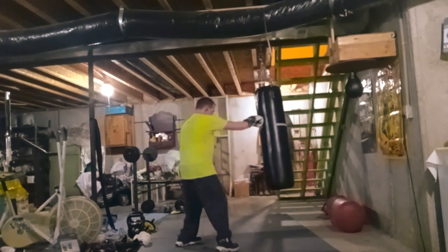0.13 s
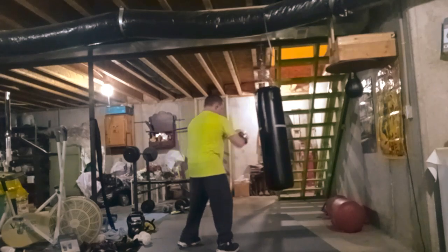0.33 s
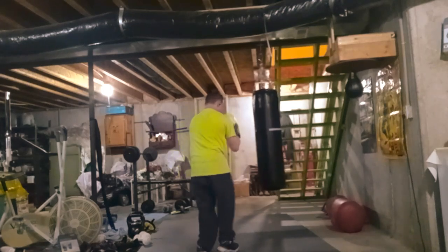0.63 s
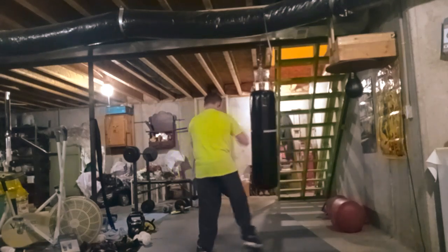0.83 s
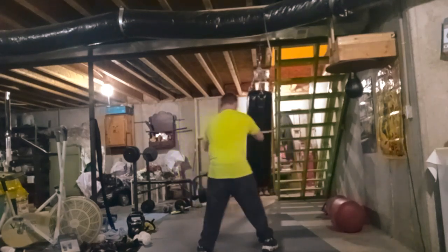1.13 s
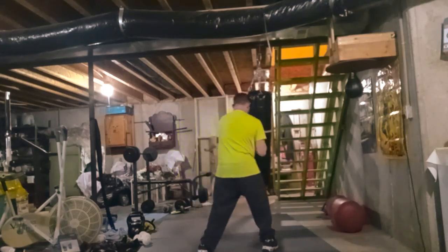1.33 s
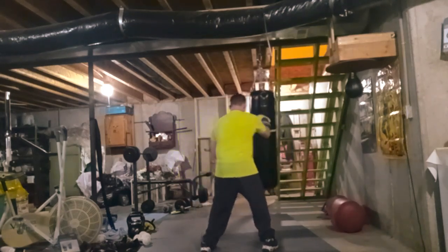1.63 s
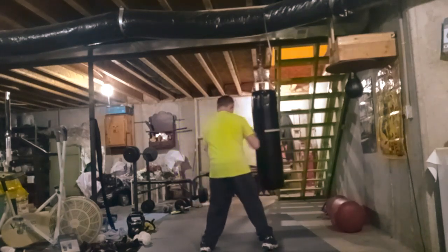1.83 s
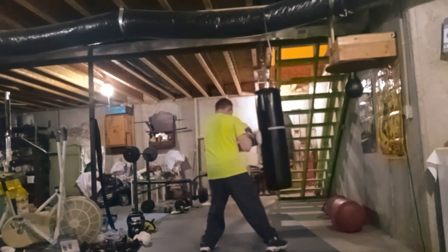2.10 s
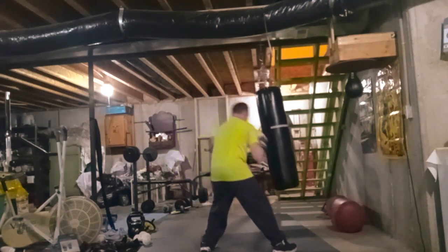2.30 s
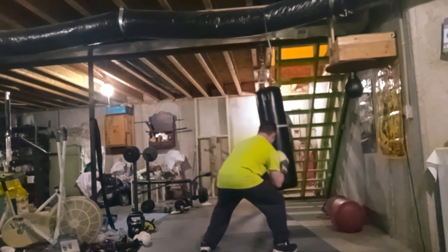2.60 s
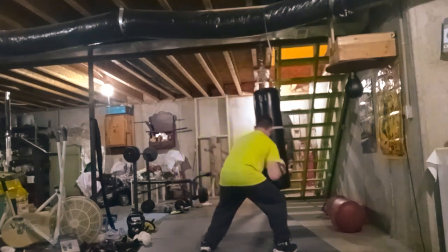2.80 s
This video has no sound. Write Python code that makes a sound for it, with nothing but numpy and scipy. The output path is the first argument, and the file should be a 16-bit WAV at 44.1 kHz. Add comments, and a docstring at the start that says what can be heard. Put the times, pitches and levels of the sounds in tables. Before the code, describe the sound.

Punching bag workout: low thuds with hollow knocks and leather slaps, rattling chain, short creaks and a shoe scrape, then the blows stop and a metallic squeal follows; short basement echo, microphone at some distance.

```python
"""A basement gym: a chain clinks, then gloves hit a heavy bag, each blow a low thud, hollow knock and leather slap.
The bag rumbles, the steel chain rattles and rings; hanger, swivel and gloves creak and squeak, a shoe slides.
The swivel squeals by stick-slip between the early blows, and again after the last, as the chain clinks on.
Blows, bursts and rattle are shaped, coloured noise; links, squeals and creaks are sines. Concrete walls give
all but the rumble and floor noise a short tail; the noisy layers dip briefly now and then."""
import sys
import numpy as np
from scipy import signal
from scipy.io import wavfile
from scipy.ndimage import uniform_filter1d

SR = 44100
rng = np.random.default_rng(int(sys.argv[2]) if len(sys.argv) > 2 else 0)


def store_pcm(level_fs):
    """Save levels as 16-bit WAV."""
    pcm = np.round(np.clip(level_fs, -1, 1) * 32767).astype(np.int16)
    wavfile.write(sys.argv[1], SR, np.atleast_2d(pcm).T)


N = 130095  # length in samples

# the clearest clinks of the chain: t/s, relative level/dB
CLINK_TIMES = [(0.1007, -21.5), (0.2703, -14), (0.3107, -12), (0.3646, -16), (0.4374, -24), (0.5741, -15),
               (0.622, -12.5), (0.7462, -16), (0.829, -21), (0.9692, -28), (1.0196, -25.5), (1.1059, -13.5),
               (1.1682, -25), (1.2052, -18.5), (1.3369, -15), (1.4596, -23), (1.51, -22.5), (1.5464, -12),
               (1.6756, -24.5), (1.7055, -18), (1.8078, -24), (1.8447, -20.5), (1.8761, -15), (1.9245, -13),
               (1.9714, -15.5), (2.0408, -16.5), (2.1196, -21), (2.2318, -26), (2.396, -24.5),
               (2.7237, -22.5), (2.8255, -25.5)]
# spectrum of leather slapping or scraping: f/Hz, relative level/dB
LEATHER_COLOUR = [(500, -21.5), (1000, -9), (1300, 0.5), (1800, 1), (2250, -4), (2800, -2.5), (3600, -10),
                  (6000, -22)]


def amp(db):
    """Decibels to gain."""
    return 10 ** (np.asarray(db) / 20)


def unit(x):
    """Scales to rms 1."""
    return x / np.sqrt(np.mean(x ** 2) + 1e-20)


def read(points, hz):
    """Reads a table on a log-frequency axis."""
    f, value = np.transpose(points)
    return np.interp(np.log(hz + 1), np.log(f + 1), value)


def follow(points, s):
    """Reads a table at the times s, in straight lines from point to point."""
    return np.interp(s, *np.transpose(points))


def add(mix, s, sound):
    """Mixes a sound in at time s."""
    part = mix[max(round(s * SR), 0):][:len(sound)]
    part += sound[:len(part)]


def lows(x, hz):
    """The part of x below hz."""
    return signal.sosfiltfilt(signal.butter(2, hz, fs=SR, output="sos"), x)


def colour(x, points):
    """Causal (minimum-phase) filter of energy 1 with the given spectrum."""
    log_gain = np.log(amp(read(points, abs(np.fft.fftfreq(8192, 1 / SR)))))
    taps = np.fft.ifft(np.exp(np.conj(signal.hilbert(log_gain)))).real[:4096]
    return signal.fftconvolve(x, taps / np.linalg.norm(taps))[:len(x)]


def waver(length, size):
    """Random unsteadiness of about rms 1, smoothed twice over size samples."""
    smooth = uniform_filter1d(uniform_filter1d(rng.standard_normal(N), size), size)
    return unit(smooth)[:length]


def slipping(hz, jitter):
    """Phase of a stick-slip tone that wavers around the pitch curve hz."""
    wavering_hz = hz * (1 + jitter * waver(len(hz), size=130))
    return 2 * np.pi * np.cumsum(wavering_hz) / SR


def burst(points, attack_s, decay_s, push=0):
    """One contact: a push, then a short, coloured spray of pressure; energy set by its envelope."""
    t = np.arange(SR // 4) / SR
    shape = (1 - np.exp(-t / attack_s)) * np.exp(-t / decay_s)
    shape /= shape.max()
    spray = shape * rng.choice([-1., 1.], len(t))
    first_instant = push * (t == 0)
    sound = colour(spray - first_instant, points)
    return sound * np.linalg.norm(shape) / np.linalg.norm(sound)


def room(x):
    """The basement's tail: sparse reflections off the walls, the treble dying first."""
    # decay of the basement: f/Hz, t60/s
    decay_times = [(60, 0.95), (150, 0.2), (400, 0.64), (1200, 0.56), (6000, 0.34), (15000, 0.14)]
    delay_s, reflections_per_s = .004, 5000
    taps = rng.choice([-1., 1.], SR) * (rng.random(SR) < reflections_per_s / SR)
    hz, t, z = signal.stft(taps, SR, nperseg=256)
    t60 = read(decay_times, hz)[:, None]
    # the root evens out the energy of long and short decays
    decay = amp(-60 * t / t60) * np.sqrt(np.log(1e6) / t60)
    tail = signal.istft(z * decay, SR, nperseg=256)[1]
    out = np.zeros(N)
    add(out, delay_s, signal.fftconvolve(x, tail / np.linalg.norm(taps)))
    return out


def dips():
    """Gain of the noisy sounds, whose level dips briefly."""
    # the dips: t/s, depth/dB
    dip_times = [(0.03, 13), (0.161, 18.5), (0.2, 14.5), (0.693, 13), (.845, 17), (0.994, 8), (1.761, 14.5),
                 (2.063, 15), (2.455, 60), (2.633, 17)]
    half_width_s = 0.01  # from the middle to 1/e of the depth in dB
    t = np.arange(N) / SR
    return amp(-sum(depth_db * np.exp(-((t - s) / half_width_s) ** 2) for s, depth_db in dip_times))


def floor_noise():
    """The quiet background of the basement: steady noise, strongest in the bass."""
    # spectrum of the background: f/Hz, relative level/dB
    floor_colour = [(25, -38), (120, 2), (220, -8), (15000, -61)]
    level_db = -73
    return amp(level_db) * colour(rng.standard_normal(N), floor_colour)


def rumble():
    """The swinging bag and the joists that carry it rumble; the filling rustles above when stirred hard."""
    # level of the rumble: t/s, level/dB
    rumble_level = [(0, -47.5), (.17, -50.5), (.42, -43), (.7, -47), (.86, -52), (1.04, -56), (1.1, -43.5),
                    (1.35, -48), (2.05, -48.5), (2.35, -47.5), (2.5, -53), (2.63, -56), (2.74, -73),
                    (2.95, -52.5)]
    # spectrum of the rumble: f/Hz, relative level/dB
    rumble_colour = [(25, -36), (55, -20), (80, -2), (100, -5.5), (122, 3.5), (170, -2.5), (260, -9.5),
                     (500, -11), (800, -11), (1300, -26.5), (4000, -30)]
    rustle_from_hz, rustle_full_db = 207, -47  # below this level the rustle fades faster than the rumble
    noise = colour(rng.standard_normal(N), rumble_colour)
    level_db = follow(rumble_level, np.arange(N) / SR)
    low = lows(noise, rustle_from_hz)
    rustle = (noise - low) * amp(2 * np.minimum(level_db - rustle_full_db, 0))
    return amp(level_db) * (low + rustle)


def shoe():
    """A sole scrapes the floor: swelling and fading noise with the colour of a slap."""
    # slides of the shoe: t/s of the middle, half length/s (to 1/e), level/dB
    slide_times = [(0.58, 0.063, -41.5), (1.632, 0.058, -46.5), (2.927, 0.035, -55.5)]
    room_db = -10
    t = np.arange(N) / SR
    slides = sum(amp(db) * np.exp(-((t - s) / half_length) ** 2) for s, half_length, db in slide_times)
    scrape = colour(rng.standard_normal(N), LEATHER_COLOUR) * slides
    return scrape + amp(room_db) * room(scrape)


def creaks():
    """Short creaks and squeaks of the hanger, swivel and gloves: stick-slip tones of unsteady pitch."""
    # the creaks and squeaks: t/s, length/s, mean f/Hz, level/dB
    creak_times = [(.188, 0.021, 795, -38), (0.189, 0.031, 522, -36.5), (0.671, 0.036, 2422, -48),
                   (0.827, 0.036, 962, -49), (0.958, 0.15, 2916, -61.5), (0.979, 0.14, 1770, -64),
                   (1.738, 0.038, 789, -33), (1.739, 0.036, 9200, -42), (2.037, 0.046, 818, -44.5),
                   (2.153, 0.025, 1850, -35.5), (2.826, 0.17, 3570, -62.5), (2.888, 0.11, 783, -58)]
    pitch_jitter, room_db = .018, -7  # jitter: rms fraction of the pitch
    out = np.zeros(N)
    for s, length, hz, db in creak_times:
        arch = np.sin(np.pi * np.arange(0, length, 1 / SR) / length)
        tone = np.sin(slipping(np.full(len(arch), hz), pitch_jitter))
        add(out, s, amp(db) * arch * unit(tone))
    return out + amp(room_db) * room(out)


def swivel():
    """Steel sticks and slips on steel: a wavering tone whose partials each flutter."""
    # course of the two squeals: t/s, mean f/Hz, level/dB
    squeal_curves = [
        [(.565, 1224, -43), (.58, 1251, -36.5), (.617, 1264, -49.5), (.626, 1276, -31.5), (.662, 1234, -34.5),
         (.67, 1320, -77)],
        [(2.39, 1266, -44), (2.412, 1244, -32), (2.436, 1267, -43.5), (2.462, 1256, -26), (2.485, 1297, -32.5),
         (2.53, 1324, -31.5), (2.55, 1298, -42.5), (2.585, 1336, -33.5), (2.61, 1250, -62)],
    ]
    # overtones of each squeal: multiple of the pitch, level/dB relative to the fundamental
    squeal_overtones = [
        [(1.91, -11.5), (2.83, -16)],
        [(1.99, -11), (2.96, -23.5)],
    ]
    pitch_jitter, flutter_db, room_db = .012, 2.5, -9  # jitter: rms fraction of the pitch
    out = np.zeros(N)
    for curve, overtones in zip(squeal_curves, squeal_overtones):
        s, hz, db = np.transpose(curve)
        t = np.arange(s[0], s[-1], 1 / SR)
        phase = slipping(np.interp(t, s, hz), pitch_jitter)
        tone = np.zeros(len(t))
        for multiple, partial_db in [(1, 0)] + overtones:
            flutter = flutter_db * waver(len(t), size=280)
            tone += amp(partial_db + flutter) * np.sin(multiple * phase)
        add(out, s[0], unit(tone) * amp(np.interp(t, s, db)))
    return out + amp(room_db) * room(out)


def shaking(s):
    """How hard the chain shakes at time s; this drives both its rattle and its small clinks."""
    # strength of the shaking: t/s, relative level/dB
    shake_level = [(0, -35.5), (.09, -49), (.19, -47.5), (.245, -33.5), (.31, -32.5), (.39, -36),
                   (.5, -42.5), (.58, -34), (.67, -42), (.77, -42.5), (.87, -50), (.96, -56.5),
                   (1.055, -63), (1.065, -39), (1.12, -35), (1.31, -43), (1.35, -45.5), (1.4, -43.5),
                   (1.55, -39), (1.695, -45.5), (1.703, -34), (1.9, -41), (2.11, -37.5), (2.35, -46.5),
                   (2.4, -39), (2.5, -45), (2.7, -58), (2.8, -57.5), (2.84, -48), (2.95, -60.5)]
    return amp(follow(shake_level, s))


def chain_rattle():
    """Loose links scrape and tick against each other at random; each clear clink starts with a tick."""
    # spectrum of links in contact: f/Hz, relative level/dB
    link_contact = [(300, -19), (900, 0.5), (1600, -2), (3000, -7), (4700, -2.5), (6600, 1.5), (7800, -1.5),
                    (10000, 2.5), (12300, 2.5), (13800, 9.5), (16000, 8.5)]
    touches_per_s, touch_spread_db = 2200, -1  # mean rate; spread: mean drop, before its cap
    rattle_db, tick_db, room_db = 5.5, -15, -8
    # links scrape when shaken hard; shaken gently, they only tick
    scrape_below_hz, scrape_full_db = 3500, -48.5
    sizes = amp(touch_spread_db * np.minimum(rng.exponential(1, N), 4))
    sizes = sizes * rng.choice([-1., 1.], N)
    touches = unit(sizes * (rng.random(N) < touches_per_s / SR))
    shake = shaking(np.arange(N) / SR)
    out = amp(rattle_db) * colour(touches * shake, link_contact)
    for s, db in CLINK_TIMES:
        add(out, s, amp(db + tick_db) * burst(link_contact, attack_s=0.0031, decay_s=0.0071))
    scraping = np.sqrt(np.minimum(shake / amp(scrape_full_db), 1))
    out = out - (1 - scraping) * lows(out, scrape_below_hz)
    return out + amp(room_db) * room(out)


def link():
    """One steel link rings in decaying modes; no two links are quite alike."""
    # modes of a link: mean f/Hz, relative level/dB, t60/s
    link_modes = [(10810, -22, .16), (13560, -7, .13), (13627, 0, .18), (13745, -1, .18), (14610, -8, .13),
                  (14660, -4, .15), (14785, -8, .12), (15710, -15, .1)]
    spread, attack_s = 0.00156, 0.0013  # spread: rms fraction of each mode's pitch
    t = np.arange(SR // 4) / SR
    ring = np.zeros(len(t))
    for mode_hz, db, t60 in link_modes:
        hz = mode_hz * (1 + spread * rng.standard_normal())
        ring += amp(db - 60 * t / t60) * np.sin(2 * np.pi * (hz * t + rng.random()))
    return ring * np.minimum(t / attack_s, 1)


def chain_ring():
    """Links ring in clear clinks with a rebound each, and in small random ones while the chain shakes."""
    ring_db, room_db = -3.5, -1
    rebound_s, rebound_db = 0.033, -10  # a link strikes again, softer, within this time
    small_count, small_db, small_law = 170, 2.5, 0.75  # law: small clinks grow more slowly than the shaking
    out = np.zeros(N)
    for s, db in CLINK_TIMES:
        add(out, s, amp(db + ring_db) * link())
        add(out, s + rebound_s * rng.uniform(0.27, 1), amp(db + ring_db + rebound_db) * link())
    # one small clink at a random moment of each equal slot
    slots = np.arange(small_count) + rng.random(small_count)
    for s in slots * N / SR / small_count:
        add(out, s, amp(small_db) * shaking(s) ** small_law * rng.random() * link())
    return out + amp(room_db) * room(out)


def bag():
    """Each punch thuds in the filling, knocks in the glove and slaps the cover: three bursts at once."""
    # blows on the bag: t/s, then relative level/dB of thud, knock and slap
    punches = [(.189, -34.5, -35.5, -53), (.272, -33.5, -38, -27.5), (0.362, -42, -38, -34.5),
               (.703, -41.5, -41, -48), (1.059, -40.5, -37, -44), (1.407, -46, -40, -61),
               (1.700, -36.5, -35.5, -45.5), (1.74, -32.5, -35, -68), (1.892, -38, -39.5, -30),
               (1.973, -59, -43, -65), (2.091, -40.5, -40.5, -42), (2.152, -40, -39.5, -34.5),
               (2.275, -50, -38.5, -36.5)]
    # spectrum of the thud: f/Hz, relative level/dB
    thud_colour = [(25, -25), (50, -17.5), (78, -1.5), (125, -1.5), (225, 3), (260, -10), (340, -13.5),
                   (900, -68.5)]
    # spectrum of the knock: f/Hz, relative level/dB
    knock_colour = [(120, -13.5), (260, -13), (390, -5.5), (520, -1), (640, -7.5), (800, 0.5),
                    (1020, -12.5), (1500, -17.5), (4000, -30.5)]
    # colour, attack/s, decay/s, gain/dB, room/dB, push (first instant against the spray that follows)
    parts = [(thud_colour, .003, .015, 3.34, -0.48, 0),
             (knock_colour, 0.00023, 0.0098, 5.23, 1.9, 3.6),
             (LEATHER_COLOUR, 0.0019, 0.0065, 2.7, 1.12, 0)]
    out = np.zeros(N)
    for k, (points, attack_s, decay_s, gain_db, room_db, push) in enumerate(parts):
        for s, *levels_db in punches:
            blow = amp(levels_db[k] + gain_db) * burst(points, attack_s, decay_s, push)
            add(out, s, blow)
            add(out, s, amp(room_db) * room(blow))
    return out


def scene():
    """Bag, shoe, chain, squeals and creaks over a quiet room; only the noisy layers dip."""
    noisy = floor_noise() + rumble() + shoe() + chain_rattle() + bag()
    tones = creaks() + swivel() + chain_ring()
    return (noisy * dips() + tones)[None]


def record(dry):
    """The recorder's band limit: a linear-phase low-pass."""
    edge_hz = 15900
    taps = signal.firwin(511, edge_hz, window=("kaiser", 9), fs=SR)
    return signal.oaconvolve(dry, taps[None], "same")


dry = scene()
out = record(dry)
store_pcm(out)
```